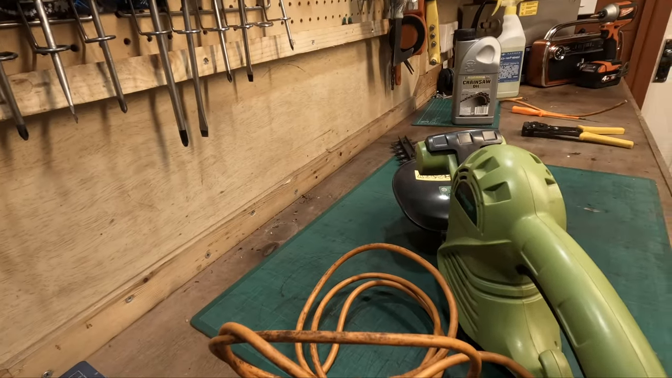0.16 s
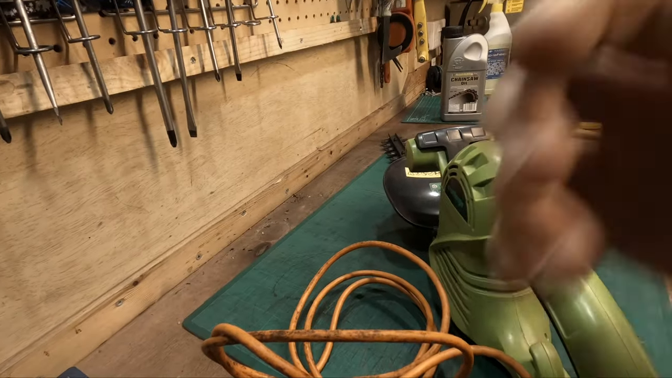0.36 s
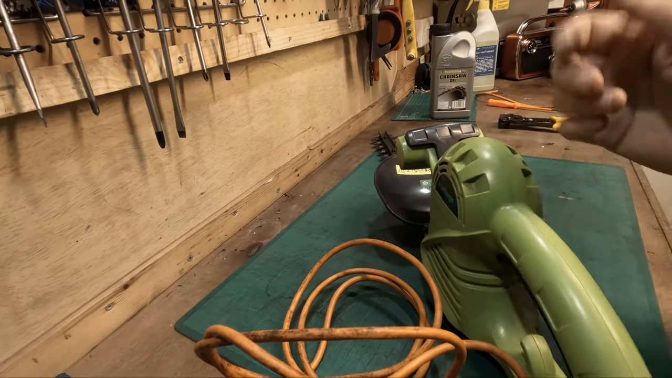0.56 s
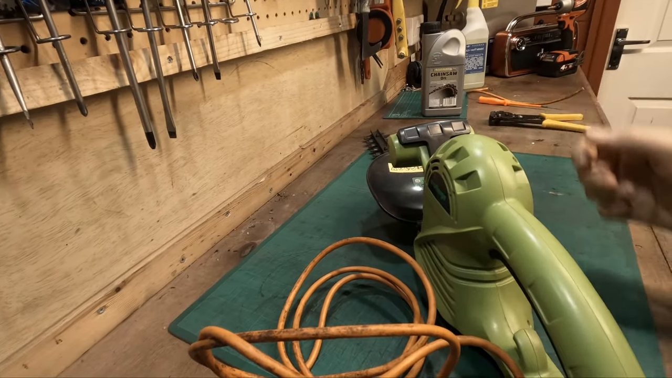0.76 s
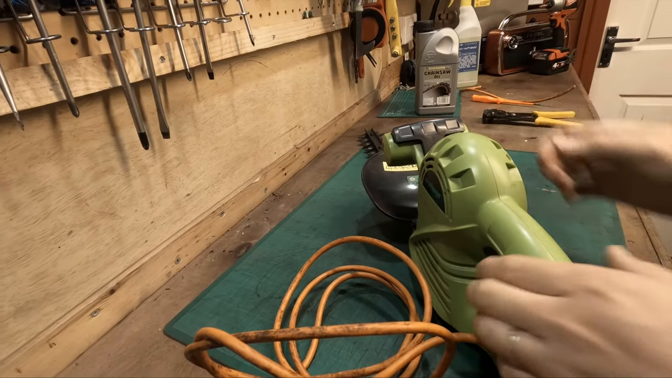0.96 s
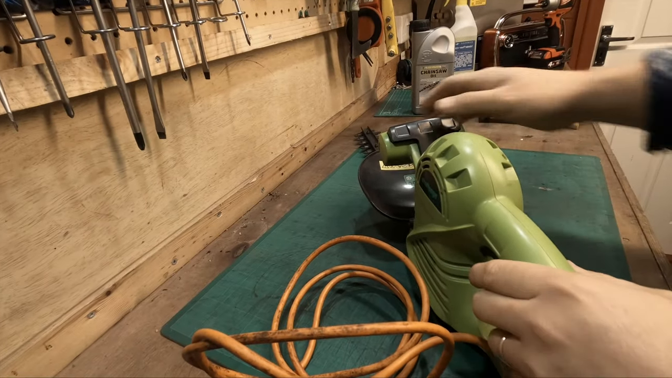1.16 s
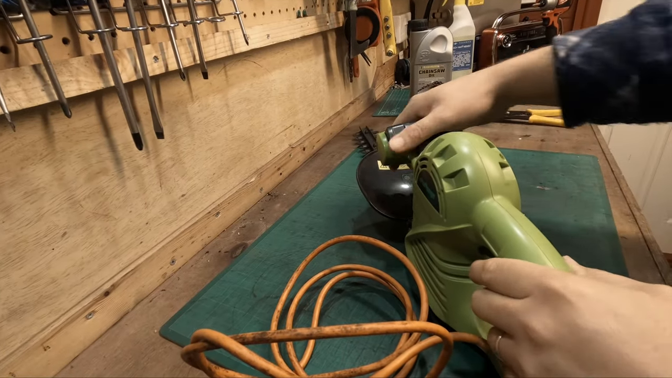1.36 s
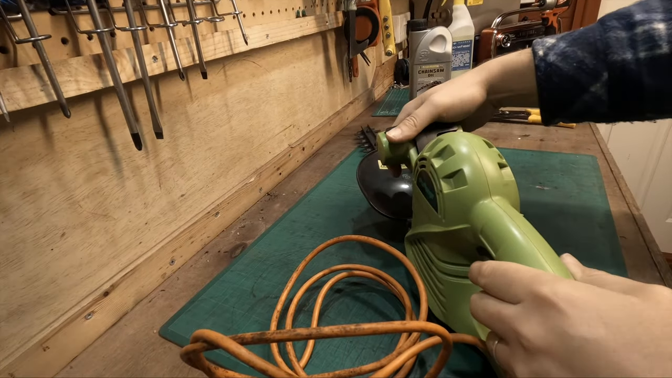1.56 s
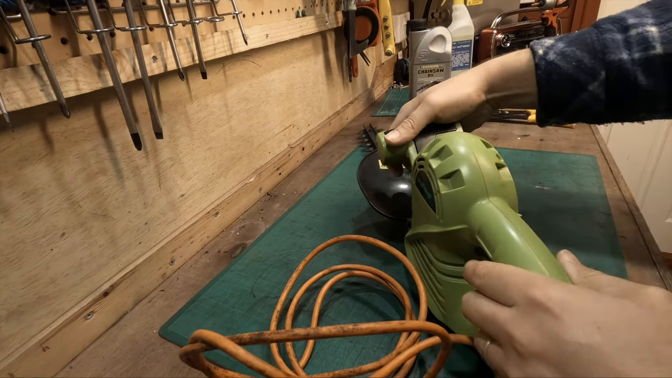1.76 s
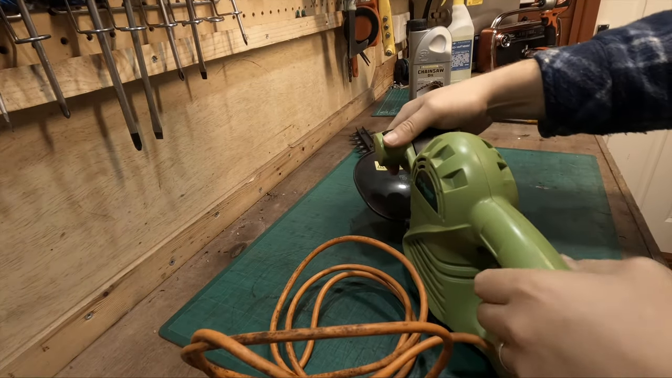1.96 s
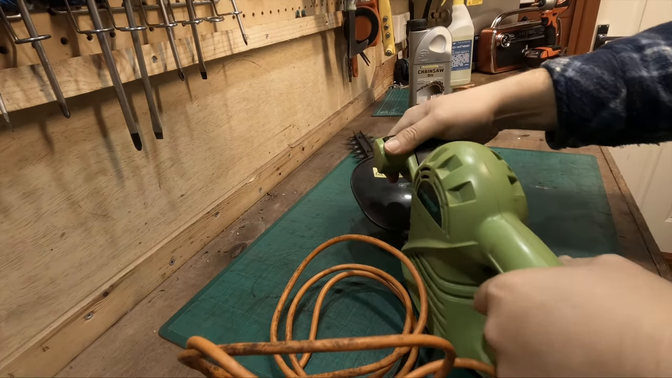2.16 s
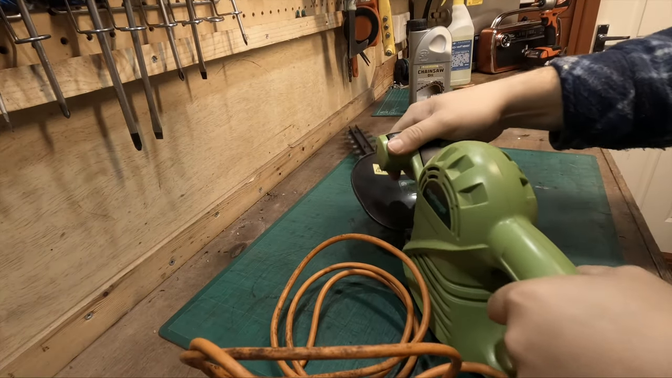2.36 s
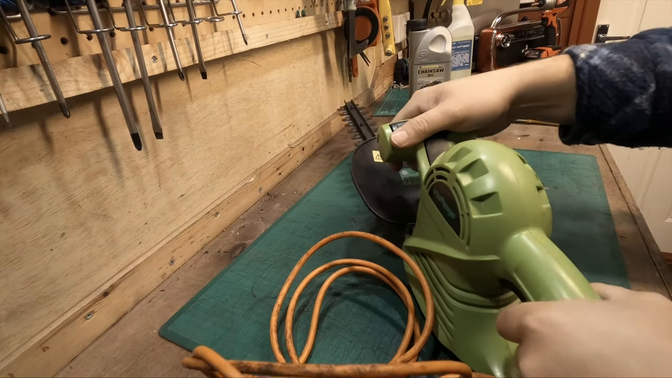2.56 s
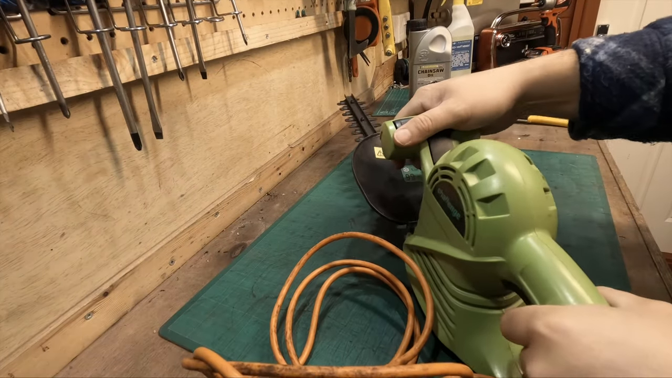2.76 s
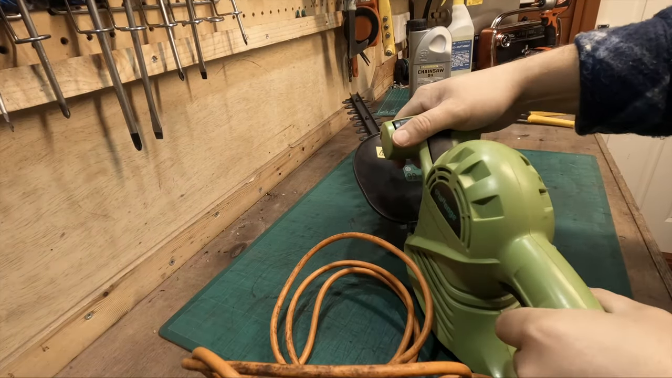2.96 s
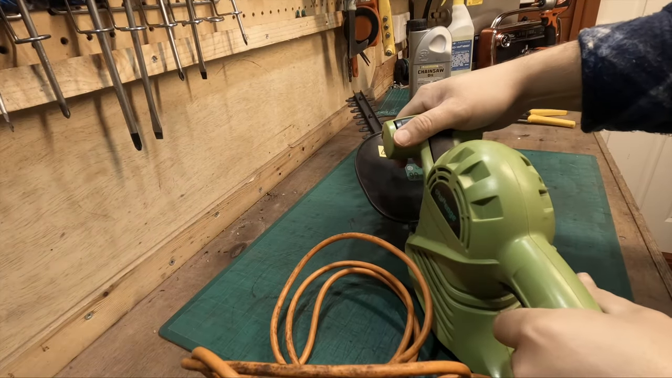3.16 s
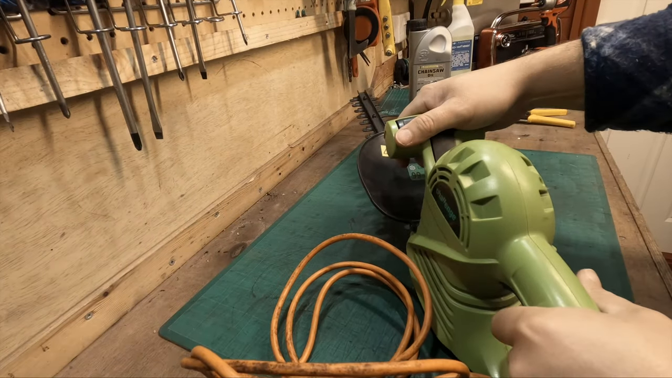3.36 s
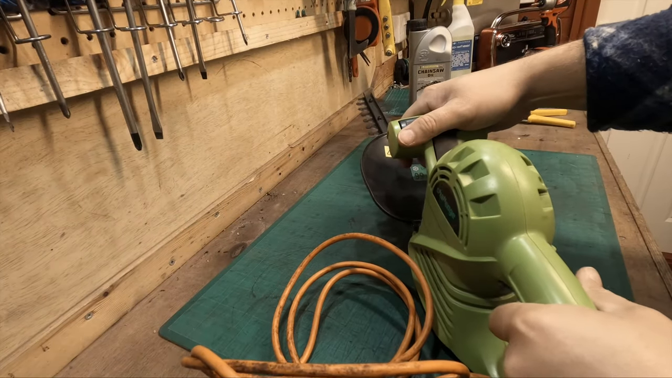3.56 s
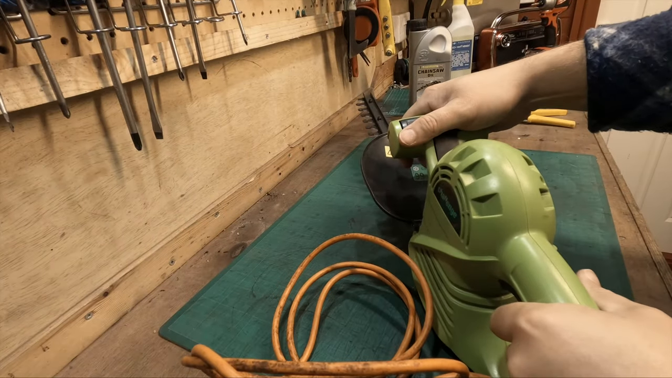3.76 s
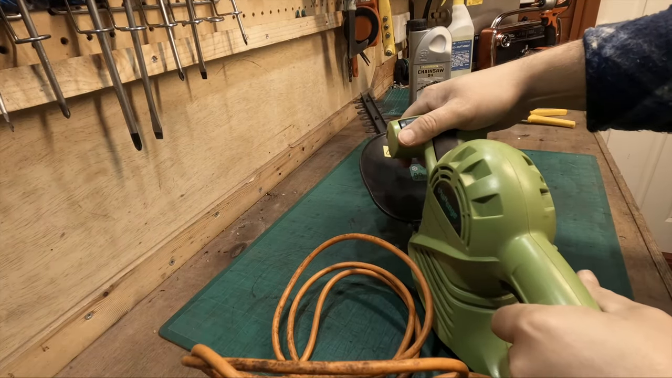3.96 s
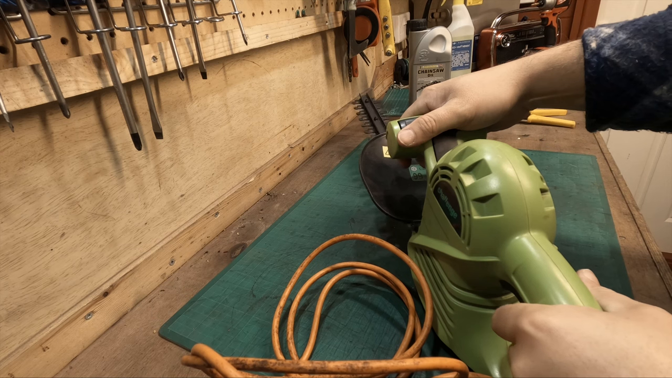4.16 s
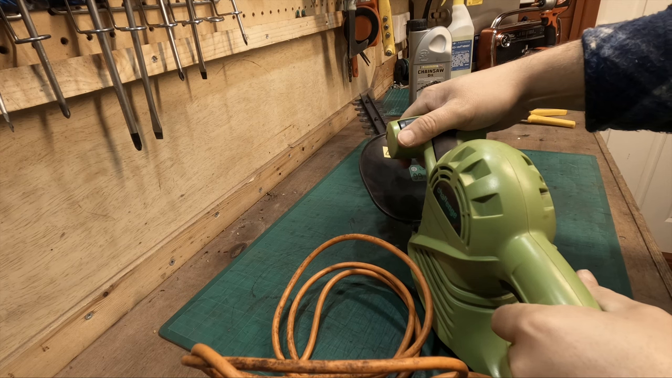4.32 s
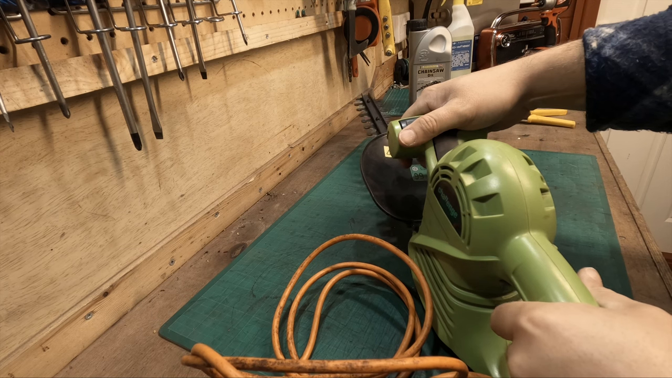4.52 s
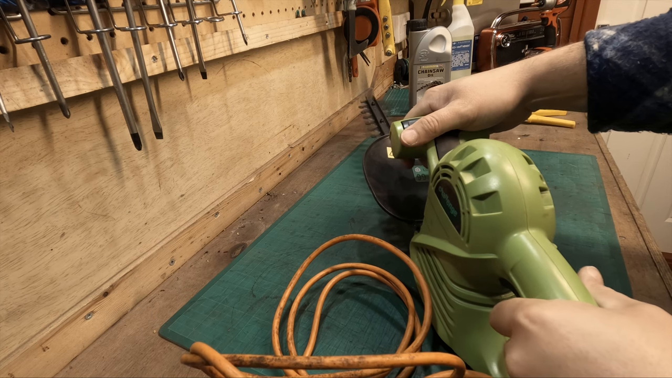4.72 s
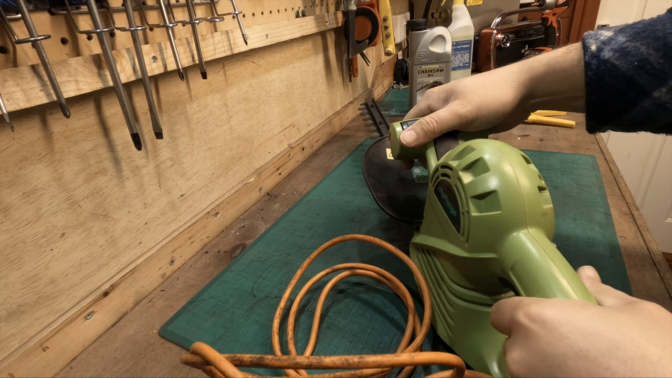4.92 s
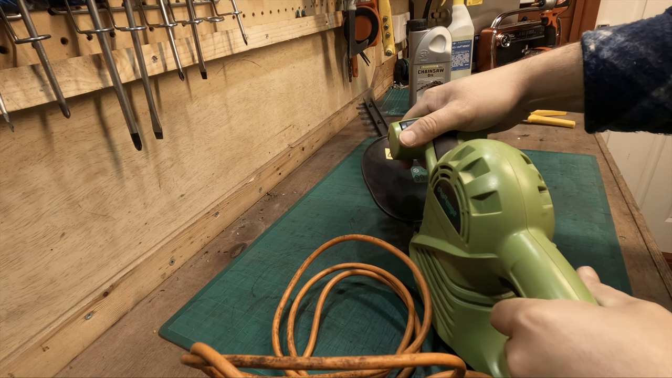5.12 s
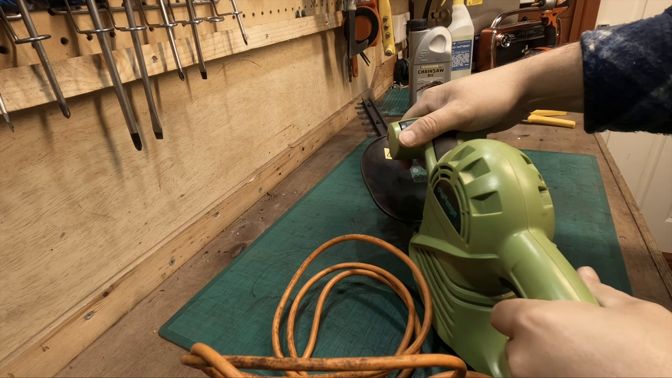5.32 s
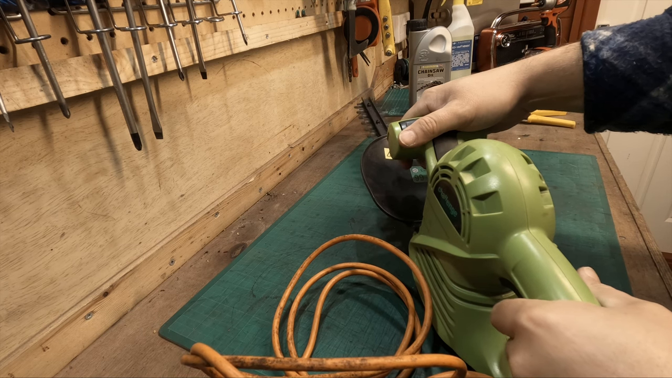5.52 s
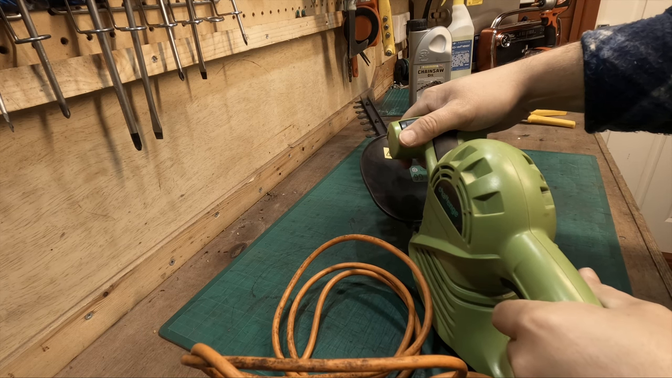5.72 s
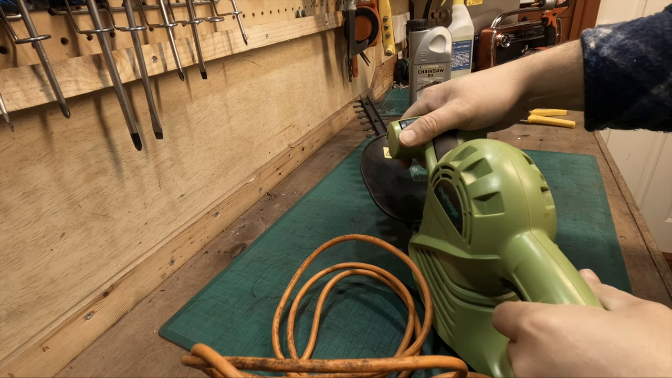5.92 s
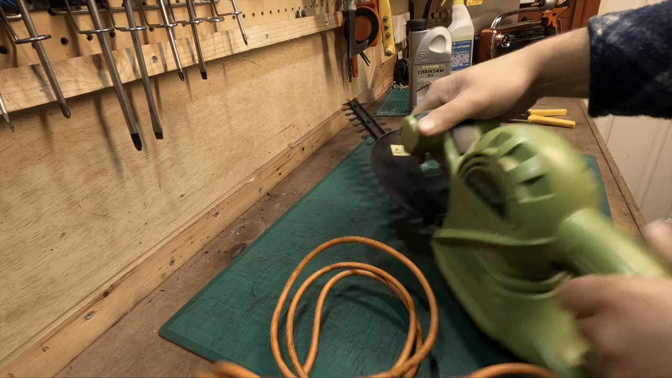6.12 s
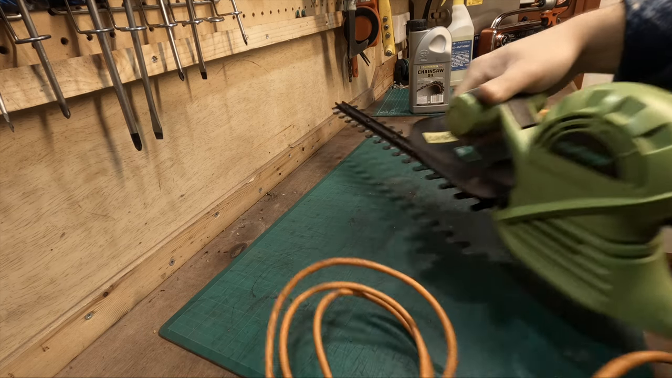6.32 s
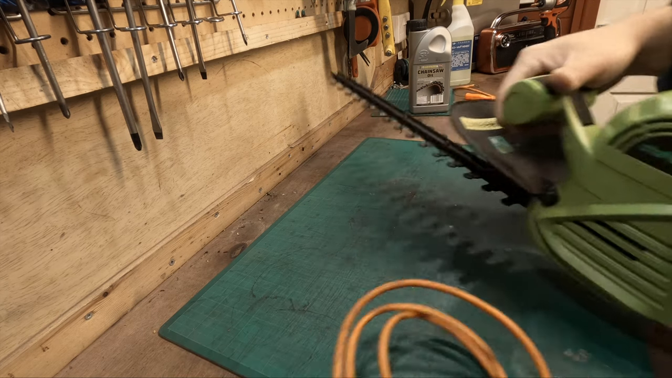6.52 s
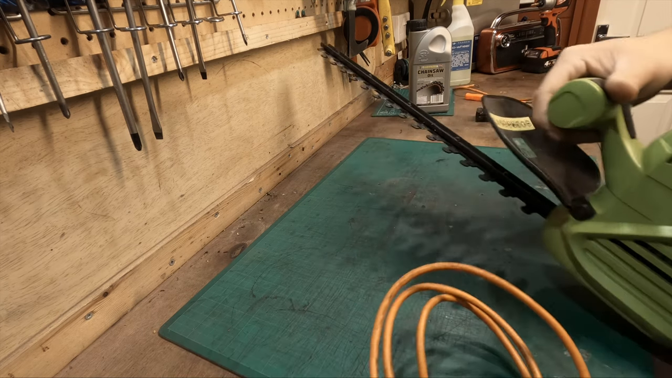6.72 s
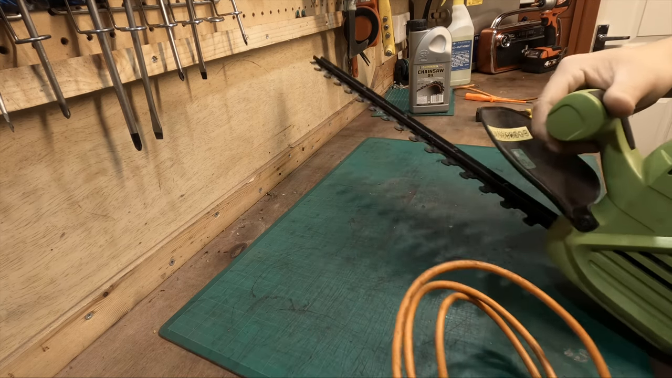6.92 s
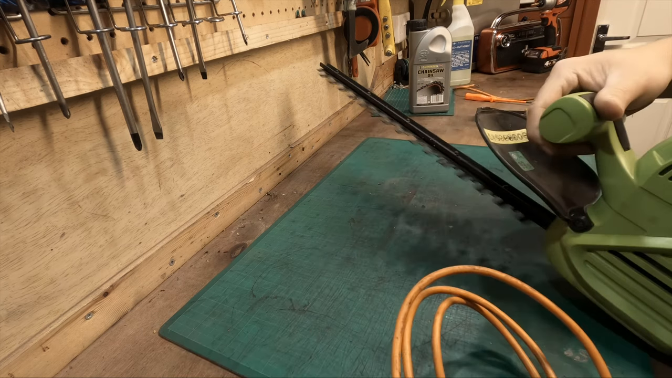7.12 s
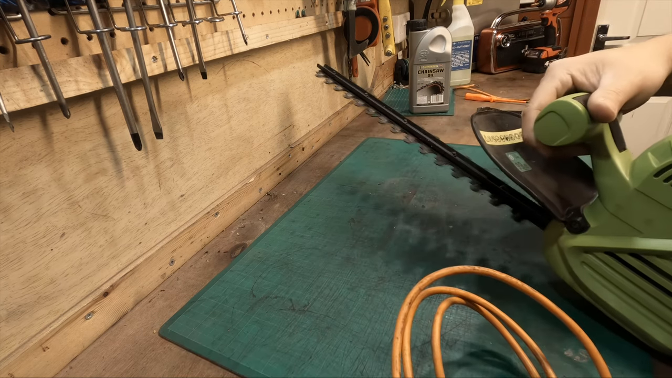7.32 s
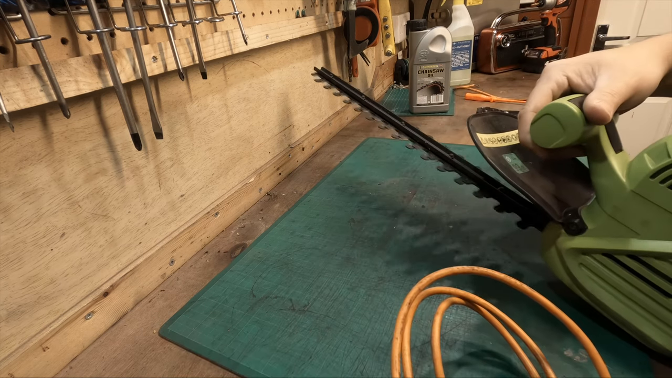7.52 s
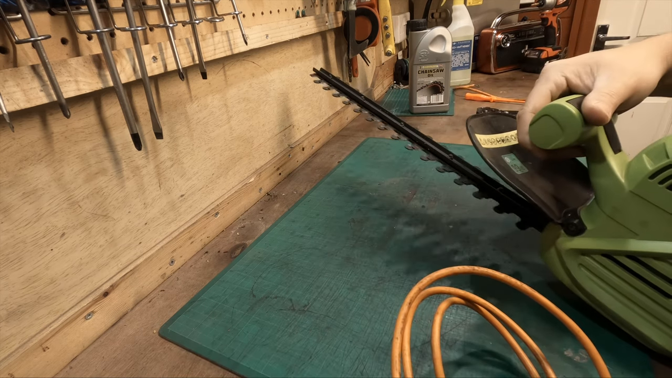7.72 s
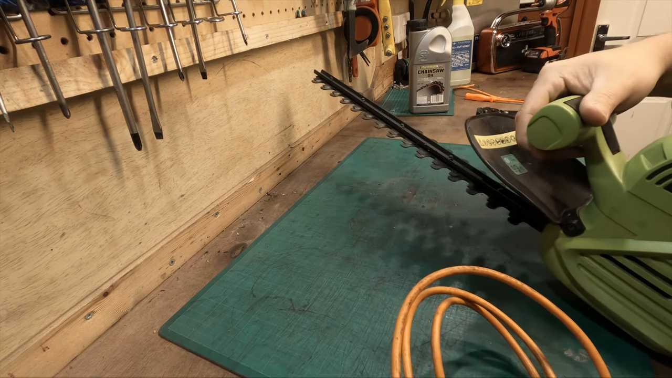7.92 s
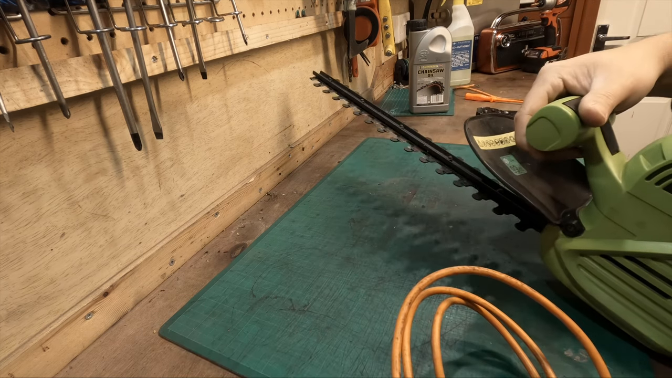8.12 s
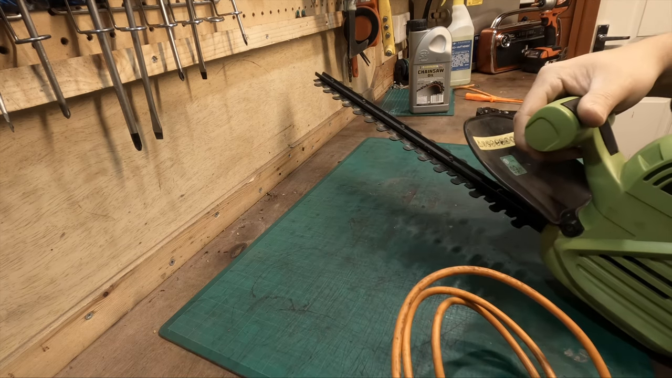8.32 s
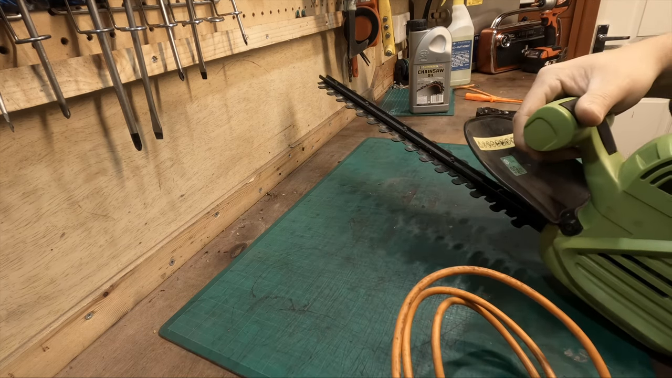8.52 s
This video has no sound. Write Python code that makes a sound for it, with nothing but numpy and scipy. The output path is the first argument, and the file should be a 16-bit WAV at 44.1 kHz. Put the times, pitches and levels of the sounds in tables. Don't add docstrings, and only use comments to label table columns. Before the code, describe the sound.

Soft rubbing, low bench thumps and crisp plastic clicks come first, heard from an arm's length in a dry room. Then an electric hedge trimmer is triggered briefly three times: each time it leaps up to a harsh metallic chatter with a thin high whine sliding down, then stops quickly. A scuff and woody bump separate the second and third bursts; quiet room tone ends it.

```python
import sys
import numpy as np
from scipy import signal
from scipy.fft import rfft, irfft, next_fast_len
from scipy.io import wavfile
from scipy.ndimage import uniform_filter1d

SR = 44100
rng = np.random.default_rng(int(sys.argv[2]) if len(sys.argv) > 2 else 0)


def generate_wav(signal):
    frames = np.transpose(np.atleast_2d(signal))
    scaled = np.clip(frames, -1, 1) * 32767
    pcm = np.round(scaled).astype(np.int16)
    wavfile.write(sys.argv[1], SR, pcm)


def invert_db(level):
    return 10 ** (np.asarray(level, dtype=float) / 20)


N = 383229
T = np.arange(N) / SR
LIFTED_S = 6.5

# (frequency [Hz], width [Hz], level [dB])
SHELL = [(780, 60, -8), (1500, 40, 0), (2250, 110, -10)]


def unit(x):
    return x / np.sqrt(np.mean(x ** 2) + 1e-20)


def noise():
    return rng.standard_normal(N)


def colour(x, points):
    hz, db = np.transpose(points)
    size = next_fast_len(len(x))
    axis = np.log(np.arange(size // 2 + 1) * SR / size + 1)
    gain = invert_db(np.interp(axis, np.log(hz), db))
    return irfft(rfft(x, size) * gain, size)[:len(x)]


def band(x, lo_hz, hi_hz):
    return signal.sosfilt(signal.butter(3, [lo_hz, hi_hz], "band", fs=SR, output="sos"), x)


def resonate(x, modes):
    return sum(invert_db(db) * signal.lfilter(*signal.iirpeak(hz, hz / width, SR), x) for hz, width, db in modes)


def walk(rate):
    hold = int(SR / rate)
    levels = np.repeat(rng.standard_normal(N // hold + 1), hold)
    return 1.2 * uniform_filter1d(levels, hold)[:N]


def grit(spread_db):
    return unit(noise() * invert_db(spread_db * np.minimum(rng.exponential(size=N), 6)))


def swells(rows):
    power, t = 0, T[::32]
    for s, rise_s, fall_s, *levels_db in rows:
        shape = invert_db(-20 * np.where(t < s, (s - t) / rise_s, (t - s) / fall_s))
        power = power + (invert_db(np.array(levels_db))[:, None] * shape) ** 2
    return [np.interp(T, t, gain) for gain in np.sqrt(power)]


def rotor():
    # (on [s], off [s], brake [s], top fan whine [Hz], coasting loss [1/s])
    blips = [
        (3.49, 3.672, 4.15, 6820, .76),
        (4.565, 4.785, 5.745, 7230, .737),
        (7.014, 7.21, 8.13, 7025, .725),
    ]
    start_hz, spin_up_s, brake_per_s = 910, .143, 5.0
    drag_per_s2, drag_s = .135, .7
    rattle_level_db, attack_db, attack_s, sag_db_per_s = -18.5, -16, .014, 5.5
    brake_step_db, brake_step_s = -3.5, .02
    brake_db_per_s, grip_s, grip_db_per_s = 100, .2, 190
    hz, db = np.full(N, 1. * start_hz), np.full(N, -140.)
    since, braked = np.zeros(N), np.zeros(N)
    for on, off, brake, top_hz, coast in blips:
        now = T >= on
        t = T[now] - on
        slowed = np.clip(T[now] - brake, 0, None)
        free = np.clip(T[now] - off, 0, None)
        up = np.tanh(np.minimum(t, off - on) / spin_up_s) / np.tanh((off - on) / spin_up_s)
        down = coast * free + drag_per_s2 * np.minimum(free, drag_s) ** 2
        down = down + brake_per_s * np.minimum(slowed, .4)
        hz[now] = (start_hz + (top_hz - start_hz) * up) * np.exp(-down)
        attack = attack_db * np.exp(-t / attack_s)
        step = brake_step_db * (1 - np.exp(-slowed / brake_step_s))
        fade = brake_db_per_s * slowed + grip_db_per_s * np.clip(slowed - grip_s, 0, None)
        db[now] = rattle_level_db + step + attack - sag_db_per_s * t - fade
        since[now], braked[now] = t, np.minimum(slowed, .3)
    return hz, db, since, braked


def air():
    # (frequency [Hz], density [dB per Hz])
    tone = [(150, -21.5), (250, 0), (413, 2.5), (535, -4.5), (870, -10), (1090, 0.5), (2260, -11.5),
            (6180, -13.5), (12000, -38), (15600, -59.5), (22000, -120)]
    return invert_db(-79) * unit(colour(noise(), tone))


def rubbing():
    # (time [s], 20 dB rise [s], 20 dB fall [s], level [dB], lows [dB])
    rubs = [(.1, .25, .1, -54, 3), (.16, .5, .025, -58, 12), (.37, .015, .1, -62, -10),
            (.41, .05, .03, -58, 0), (.51, .015, .22, -69, -14), (.69, .12, .2, -75, -8),
            (1.09, .012, .3, -64, -14), (1.34, .012, .3, -58, -16), (1.42, .15, .2, -57, -14),
            (1.49, .04, .05, -62, -2), (1.68, .6, .08, -60, -8), (1.9, .015, .3, -59, -12),
            (2.1, .06, .2, -48, -7), (2.16, .13, .15, -39.5, -5.5), (2.23, .1, .04, -47, -6),
            (2.3, .1, .11, -61, -11), (3.28, .1, .3, -74, -4), (3.48, .1, .02, -67, -10),
            (4.53, .06, .05, -58, -10), (6.2, .2, .5, -68, -6), (6.4, .14, .4, -51, 6),
            (6.5, .2, .14, -41, -1), (6.565, .08, .06, -44, -3), (6.8, .2, .3, -62, -6),
            (6.67, .3, .35, -58, 3), (6.99, .1, .06, -60, -7), (8.69, .08, .05, -68, -12)]
    # (frequency [Hz], width [Hz], level [dB])
    turned_shell = [(1420, 160, 3), (2420, 260, 1)]
    turned = T > 5.9
    rub, deep = swells([(s, rise, fall, db, db + lows_db) for s, rise, fall, db, lows_db in rubs])
    grains = grit(1.9) * invert_db(1.1 * walk(90))
    grains = grains + np.where(turned, resonate(grains, turned_shell), 2.3 * resonate(grains, SHELL))
    middle = rub * unit(band(grains, 1000, 4000))
    lows = deep * unit(band(grains, 350, 690))
    highs = unit(colour(band(grains, 3800, 12000), [(5000, 0), (12000, -24)]))
    highs = rub * invert_db(-3 - 11 * turned) * highs

    start_s, end_s, slips_per_s, creak_db = 2.52, 2.65, 65, -63
    slips = np.diff(np.floor(slips_per_s * T + .15 * walk(40)), prepend=0) > 0
    swell = np.sin(np.pi * np.clip((T - start_s) / (end_s - start_s), 0, 1) ** 1.5) ** .5
    creak = unit(resonate(slips * invert_db(2 * noise()), [(800, 130, 11), (1590, 310, 8), (2400, 500, -18)]))
    return middle + lows + highs + invert_db(creak_db) * swell * band(creak, 500, 2050)


def clicks():
    # (time [s], peak [dB], ring [Hz], brightness [dB], crack [Hz])
    fingers = [(.119, -40, 900, -8, 3000), (.366, -55.5, 2330, 2, 5000), (1.136, -36.5, 1510, 3, 2550),
               (1.191, -46.5, 2600, 4, 3950), (1.333, -35.5, 1450, -4, 2600), (1.572, -43, 821, 5, 4100),
               (1.653, -41, 832, 3, 4100), (1.71, -13, 1560, -17, 4700), (1.889, -18, 1400, .5, 6200),
               (2.024, -29.5, 1480, 2, 4500), (2.316, -37, 1600, -8, 3000), (2.341, -14, 1430, 2, 4300),
               (2.771, -45.5, 1890, -10, 4000), (3.072, -41, 1000, 3, 4700), (3.124, -38, 748, -11.5, 2200),
               (3.163, -33.5, 1900, -5, 3800), (3.181, -39, 1200, -10, 2100), (3.268, -54, 799, -3, 5000),
               (3.315, -54, 1900, -8, 5000), (3.356, -52, 830, -10, 2600), (3.402, -52, 830, -10, 2600),
               (3.425, -52, 900, -6, 3500), (6.166, -39, 703, -8, 2600), (6.311, -44, 600, -8, 2500),
               (6.327, -32, 2070, -3, 3000), (8.489, -66, 1320, -12.5, 4000),
               (8.633, -50.5, 1700, -5, 4000)]
    # (time [s], peak [dB], ring [Hz], brightness [dB], crack [Hz])
    switches = [(3.449, -29, 1440, .5, 3800), (3.493, -12, 2090, 7, 7000), (4.139, -13, 2060, -3, 4000),
                (4.279, -24.5, 834, -10, 2500), (4.368, -46, 1700, -3, 4500), (4.503, -28, 1330, -11, 4000),
                (4.533, -32, 1130, 2, 4500), (4.566, -19, 1900, 8, 3400), (6.936, -43, 888, -8, 3000),
                (6.95, -26, 1990, -9, 5500), (6.982, -33, 1390, -3, 4500), (7.014, -21, 2170, 10, 6500),
                (8.359, -41, 1330, -6, 5000), (8.409, -54, 759, -5, 4000)]
    lead_s = .018
    events = [(*c, -21 - .3 * (c[1] + 35)) for c in fingers] + [(*c, -12) for c in switches]
    out, t = np.zeros(N + SR), T[:SR // 5]
    after = np.clip(t - lead_s, 0, None)
    lead = invert_db(-21.5) * (t / lead_s) ** 2 * (t < lead_s)
    for s, peak_db, ring_hz, bright_db, crack_hz, tail_db in events:
        grip = rng.standard_normal((len(SHELL), 2))
        tail = invert_db(tail_db - 60 * after / .2)
        snap = np.minimum(after / .0017, 1) * (np.exp(-after / .0026) + tail)
        burst = rng.standard_normal(len(t)) * (lead + snap)
        gripped = []
        for (hz, width, db), (shift, damp) in zip(SHELL, grip):
            mode_db = db + 2 * damp + 9 - 9 * abs(np.log2(hz / ring_hz))
            gripped.append((hz * (1 + .01 * shift), width, mode_db))
        ring = resonate(burst, [(ring_hz, 300, 0), (1.5 * ring_hz, 600, -10)]) + resonate(burst, gripped)
        ring = band(ring, 550, 4000)
        crack = colour(band(burst, 2300, 13000), [(5500, 4.5), (9000, -8), (14000, -20)])
        crack = crack + 2.5 * resonate(crack, [(crack_hz, crack_hz / 8, 0)])
        hit = ring / np.abs(ring).max() + invert_db(bright_db) * crack / np.abs(crack).max()
        start = int((s - lead_s) * SR)
        out[start:start + len(t)] += invert_db(peak_db - 4) * hit
    return out[:N]


def bench():
    # (time [s], 20 dB rise [s], 20 dB fall [s], thump [dB], board [dB])
    pushes = [(.12, .5, .1, -48, -50), (.41, .06, .17, -44, -48.5), (1.125, .025, .5, -33, -59),
              (1.36, .1, .13, -39, -44), (1.68, .06, .4, -34, -62), (1.85, .2, .2, -38, -56),
              (2.0, .15, .1, -38, -46), (2.18, .17, .15, -33, -32), (2.38, .1, .1, -42, -50),
              (2.61, .2, .13, -46, -54), (2.9, .2, .13, -55, -65), (3.19, .08, .045, -36, -59),
              (3.32, .05, .2, -44, -62), (3.52, .03, .12, -17, -28), (3.73, .15, .15, -30, -22),
              (4.51, .02, .2, -37, -51), (4.61, .08, .16, -27, -24), (4.81, .15, .2, -35, -27),
              (6.1, .07, .1, -37, -45), (6.46, .2, .2, -46, -42), (6.7, .12, .065, -46, -20),
              (6.95, .03, .2, -46, -52)]
    # (time [s], 20 dB rise [s], 20 dB fall [s], board [dB], upper board [dB])
    taps = [(.14, .4, .05, -40, -40), (.41, .05, .05, -55, -53), (1.23, .07, .06, -48, -51),
            (1.72, .04, .08, -48, -47), (1.91, .04, .1, -48, -53), (2.18, .17, .17, -30, -33.5),
            (3.44, .08, .1, -45, -52), (3.52, .04, .25, -26, -25), (6.34, .12, .5, -52, -44),
            (6.56, .04, .06, -20, -26), (6.94, .015, .15, -46, -38), (6.84, .06, .08, -44, -48),
            (7.06, .03, .15, -22, -27), (8.52, .07, .05, -70, -63)]
    # (frequency [Hz], width [Hz], level [dB])
    thump_modes = [(38, 25, -6.5), (55, 10, 10)]
    board_modes = [(104, 75, -11), (117, 27, 12.5)]
    upper_modes = [(200.6, 30, 2.5), (222.2, 58, -2)]
    # (thump [dB], board [dB], upper board [dB])
    shake_levels = [-14, -9.5, -15]
    lifted_levels = [-25, -18, -5.5]
    # (thump [dB/s], board [dB/s], upper board [dB/s])
    lingers = [70, 50, 45]
    # (thump [dB], board [dB], upper board [dB])
    rest_levels = [-74, -84, -80]
    thump_push, board_push = swells(pushes)
    board_tap, upper_tap = swells(taps)
    drives = [thump_push, np.hypot(board_push, board_tap), np.hypot(invert_db(-14) * board_push, upper_tap)]
    thump = unit(resonate(resonate(noise(), thump_modes), [(47.3, 20, 0)]))
    board = unit(band(resonate(noise(), board_modes), 80, 140))
    upper = unit(band(resonate(noise(), upper_modes), 160, 313.4))
    _, rattle_db, _, braked = rotor()
    parts = zip([thump, board, upper], drives, rest_levels, shake_levels, lifted_levels, lingers)
    out = 0
    for part, push, rest_db, shake_db, lifted_db, linger in parts:
        shake_db = rattle_db + linger * braked + shake_db + lifted_db * (T > LIFTED_S)
        shake = invert_db(shake_db + 2.2 * walk(8))
        out = out + part * np.sqrt(push ** 2 + shake ** 2 + invert_db(rest_db) ** 2)
    return out


def trimmer():
    # (frequency [Hz], density [dB per Hz])
    rattle_curve = [(160, -33.5), (280, 6), (405, -8), (807, 1.5), (938, -7.5), (1330, 5), (2490, 6.5),
                    (3910, 3), (4550, 2), (6580, -13), (8190, -33), (12500, -53.5), (15500, -42)]
    # (frequency [Hz], width [Hz], level [dB])
    housing = [(1345, 120, -3), (1670, 180, -7), (2200, 130, -3), (2840, 120, -8.5), (3210, 140, -4),
               (3860, 320, -3)]
    housing_lows = [(420, 220, -8.5), (647, 110, -1), (772, 80, -2.5), (846, 89, -7.5)]
    # (frequency [Hz], level [dB])
    flat_vent = [(3450, -40), (3650, -26), (4950, -29), (5700, -39), (6030, -27), (6250, -33), (6600, -26),
                 (6950, -44)]
    turned_vent = [(4400, -42), (4800, -28), (5250, -38), (5550, -28), (5880, -36), (6300, -23),
                   (6800, -25), (7100, -27)]
    # (multiple of shaft rate, level against rattle [dB])
    gear_lines = [(11.55, -17), (13.55, -18), (23, -30), (25.1, -24)]
    fan_blades, teeth, turns_per_stroke = 22, 12.55, 6.6
    whine_hz, rattle_db, since, braked = rotor()
    lifted = T > LIFTED_S
    choke_db = 300 * braked

    turns = np.cumsum(whine_hz / fan_blades * (1 + .0015 * walk(60))) / SR
    stroke = turns / turns_per_stroke + .25 * walk(9)
    slap = 1 + .3 * np.cos(np.pi * stroke) ** 4 * invert_db(2.5 * walk(30))
    chatter = grit(1.8) * invert_db(1.5 * walk(350))
    chatter = chatter * slap * (1 + .1 * np.sin(2 * np.pi * turns))
    panels = sum(resonate(chatter * invert_db(3 * walk(25)), [mode]) for mode in housing)
    rattle = colour(chatter + 1.31 * panels, rattle_curve)
    middle = rattle / np.std(band(rattle, 1000, 5000))

    lows_db = -6 - 16 * np.exp(-since / .04) + 48 * braked + 2.1 * lifted
    lows = unit(band(resonate(chatter, housing_lows), 350, 1300)) * invert_db(lows_db)
    hiss_db = -23.8 + 1.5 * np.log2(whine_hz / 6000) - 55 * braked + 6 * lifted - 5 * np.exp(-since / .12)
    hiss = band(np.roll(chatter, -SR), 7500, 12800)
    hiss = unit(colour(hiss, [(8000, 0), (12500, -9)])) * invert_db(hiss_db)
    fizz_db = hiss_db - 13.2 + 10 * np.minimum(since, 1.2) - 3 * lifted
    fizz = band(np.roll(chatter, SR), 10500, 15500)
    fizz = unit(colour(fizz, [(11000, 0), (14500, -14), (15500, -26)])) * invert_db(fizz_db)
    body = band(middle, 900, 8000) + fizz + lows + hiss + .4 * band(middle, 170, 490)

    flat_db, turned_db = (np.interp(whine_hz, *np.transpose(vent)) for vent in (flat_vent, turned_vent))
    whine_db = np.where(lifted, turned_db, flat_db) + np.minimum(rattle_db + 27, 0) - choke_db
    whine_db = whine_db - 20 * (np.gradient(whine_hz) > 0) * np.clip((6100 - whine_hz) / 300, 0, 1)
    fan = np.sin(2 * np.pi * fan_blades * turns) * invert_db(3.5 * walk(40) - 3.5)

    gears = sum(np.sin(2 * np.pi * k * turns) * invert_db(db + 4 * walk(20) - choke_db) for k, db in gear_lines)
    gears = band(gears, 2000, 6700)

    pull = np.clip(uniform_filter1d(np.gradient(whine_hz) * SR, 900) / 12000, .05, 1)
    mesh = np.sin(2 * np.pi * teeth * turns) * pull * (.7 + .7 * walk(200))
    mesh = resonate(mesh, [(3500, 1300, 0), (1900, 700, -9)]) * invert_db(rattle_db - 6 * lifted)

    shaft_db = rattle_db - 15.7 + 1.5 * lifted + 2.2 * walk(8) - 14 * np.exp(-since / .1) - choke_db / 2
    shaft_db = shaft_db + 1.8 * walk(25) - .5 * np.clip(170 - whine_hz / fan_blades, 0, 40)
    shaft = np.sin(2 * np.pi * turns) * invert_db(shaft_db)
    return invert_db(rattle_db) * (body + gears) + invert_db(whine_db) * fan + mesh + shaft


def knock():
    # (time [s], peak [dB])
    bump = [
        (6.535, -9.5),
    ]
    # (frequency [Hz], level [dB], 60 dB decay [s])
    modes = [(118, 0, .5), (244, -10, .12), (500, -.5, .046), (654, -8, .04), (733, .5, .036),
             (899, -20, .03), (955, -20, .03), (1120, -25, .025)]
    (s, peak_db), = bump
    out, first = 0, int((s - .01) * SR)
    for lag_s, blow_db in [(-.006, -4), (0, 0)]:
        t = np.clip(T[first:first + SR // 2] - s - lag_s, 0, None)
        out = out + sum(invert_db(blow_db + db - 60 * t / t60) * np.sin(2 * np.pi * hz * t) for hz, db, t60 in modes)
    padded = np.pad(band(out, 60, 1500), (first, N - first - len(out)))
    return invert_db(peak_db) * padded / np.abs(out).max()


def sides(mid, scatter):
    # (frequency [Hz], level [dB])
    side_share = [(60, -23), (110, -27), (200, -14.5), (380, -6), (700, -21), (1290, -26.5), (2380, -21.5),
                  (4400, -13), (8120, -5.5), (15000, 9.5)]
    # (from [s], to [s], level [dB])
    wide_spans = [(2.349, 3.45, 3.5), (3.438, 4.001, 12.5), (4.01, 4.34, 3.5), (4.559, 4.872, -8.5),
                  (5.156, 5.255, -2), (5.45, 5.556, -3.5), (5.783, 5.817, -2), (6.947, 7.042, -6),
                  (7.134, 7.166, -9.5), (7.485, 7.587, -4), (7.788, 7.849, -5.5), (8.135, 8.305, -3)]
    side = colour(signal.fftconvolve(mid, scatter)[:N], side_share)
    wide = sum(invert_db(db - 12) * ((T > start) & (T < end)) for start, end, db in wide_spans)
    treble = band(side, 11000, 16000)
    below = side - colour(side, [(10000, -63.5), (11500, -.5)])
    return below * uniform_filter1d(wide, size=400) + invert_db(-4.5) * treble


def scene():
    near = trimmer() + rubbing() + clicks() + knock()
    t = T[:SR // 5]
    decay_s = np.array([[.16], [.05]])
    wall = rng.standard_normal((2, len(t))) * invert_db(-60 * t / decay_s)
    wall /= np.sqrt((wall ** 2).sum(axis=1)[:, None])
    mid = near + invert_db(-11) * signal.fftconvolve(near, wall[0])[:N] + bench() + air()
    side = sides(mid, wall[1])
    return np.array([mid + side, mid - side])


def band_limit(x):
    return signal.sosfilt(signal.butter(12, 15710, fs=SR, output="sos"), x)


def record(dry):
    mix = np.tanh(1.279 * dry) / 1.236
    return band_limit(mix)


dry = scene()
out = record(dry)
generate_wav(out)
```